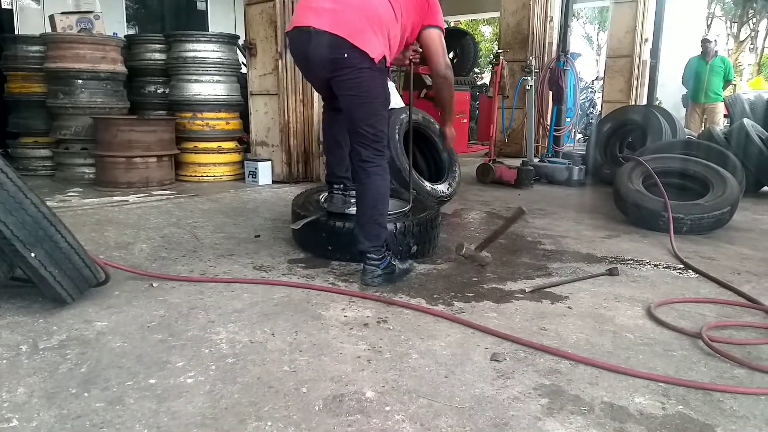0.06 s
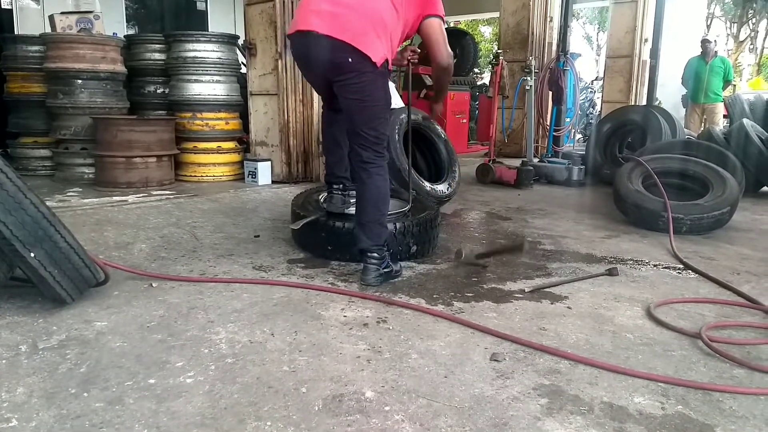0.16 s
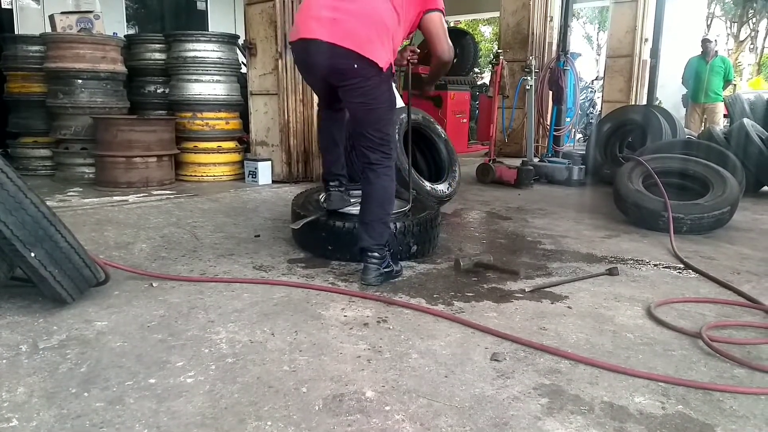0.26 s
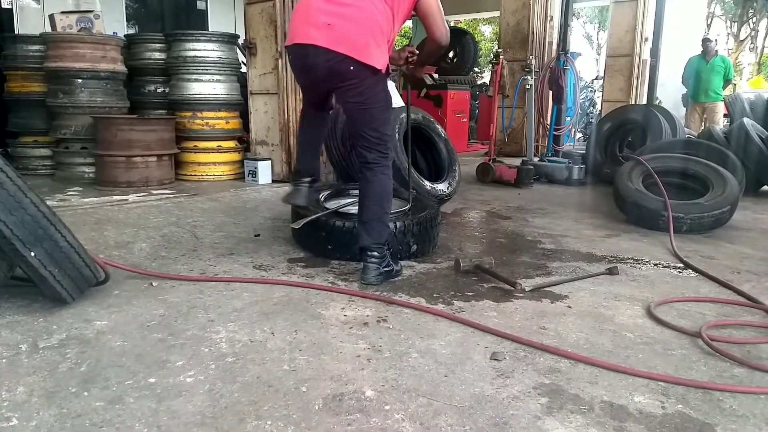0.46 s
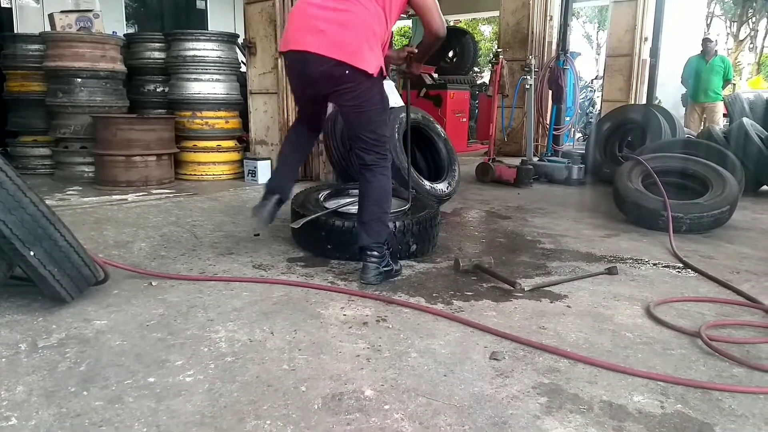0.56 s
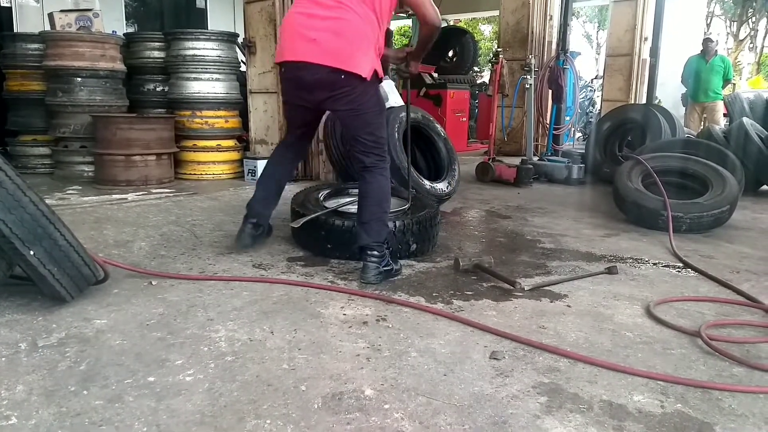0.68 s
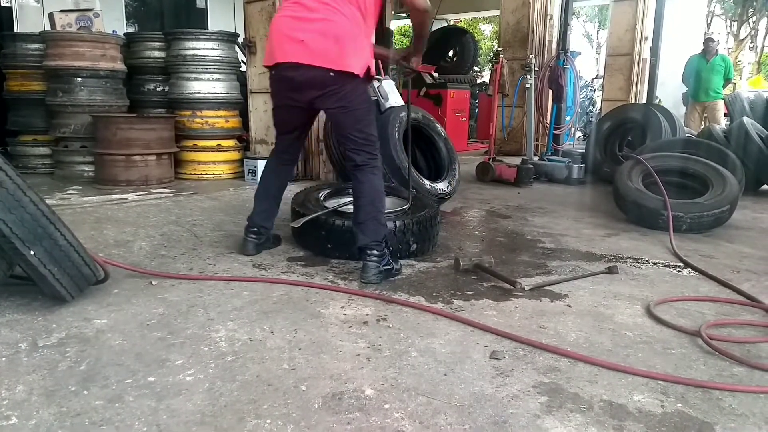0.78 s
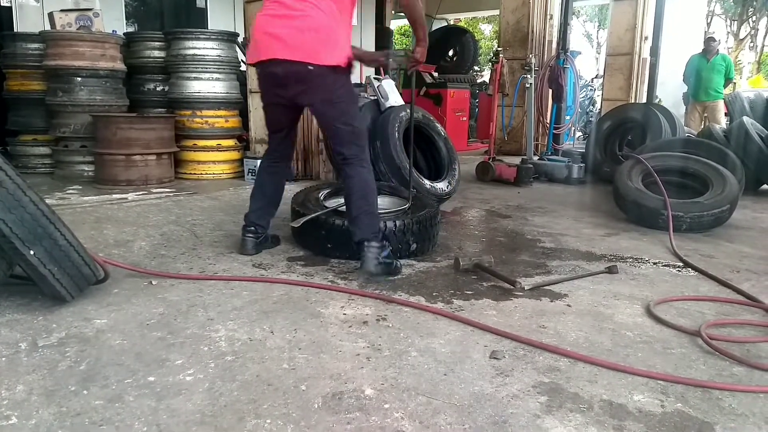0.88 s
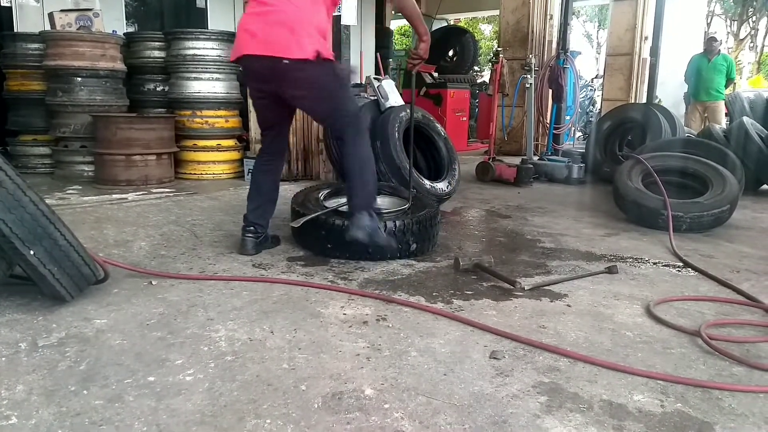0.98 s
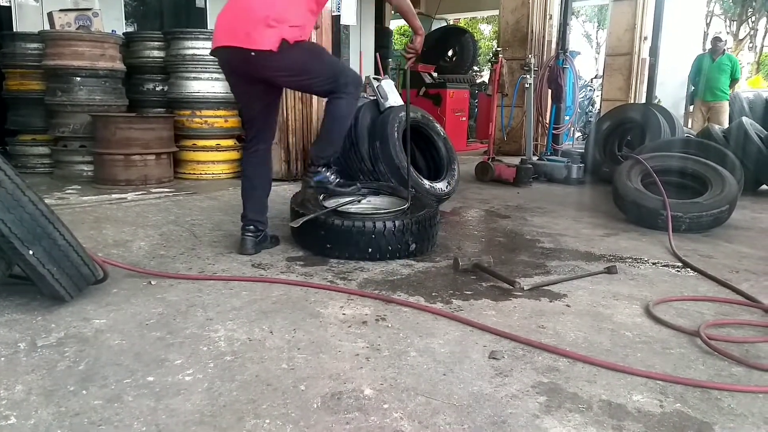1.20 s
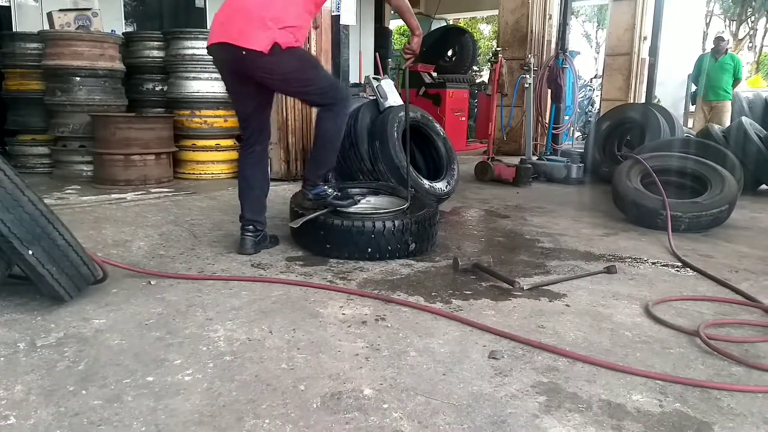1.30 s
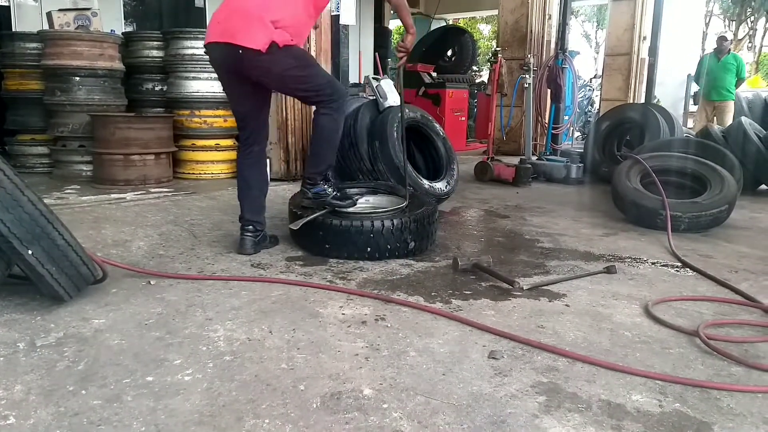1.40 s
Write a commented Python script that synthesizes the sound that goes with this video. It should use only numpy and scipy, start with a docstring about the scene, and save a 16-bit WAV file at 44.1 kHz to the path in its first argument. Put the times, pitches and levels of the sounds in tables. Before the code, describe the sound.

A steel tool falls on a concrete floor, bounces, clatters and rings briefly. Shoes scuff faintly, then a tyre bumps softly as a lever knocks once on its rim. The open workshop has a short echo and low background noise.

```python
"""An open workshop: low steady noise, and the shed's echo of earlier work dying away.
Shoes scuff and thud, grit cracks. At 0.22 s a steel tyre tool lands on the concrete floor,
slaps down, rattles and rings. Near 1.3 s the tyre bumps hollowly under boot and lever,
and the lever knocks once against the wheel rim. The microphone is dull and nearly mono."""
import sys
import numpy as np
from scipy import signal
from scipy.fft import rfft, irfft
from scipy.io import wavfile
from scipy.ndimage import uniform_filter1d, minimum_filter1d

SR = 44100
rng = np.random.default_rng(int(sys.argv[2]) if len(sys.argv) > 2 else 0)


def log_audio(samples):
    """Write samples as a 16-bit WAV file to the path given in sys.argv[1]."""
    # one column per channel
    frames = np.atleast_2d(samples).T
    # limit to full scale, then quantise
    limited = np.clip(frames, -1, 1)
    pcm = np.round(limited * 32767).astype(np.int16)
    wavfile.write(sys.argv[1], SR, pcm)


N = 63945
T = np.arange(N) / SR


def amp(db):
    """Decibels to gain."""
    return 10 ** (np.asarray(db) / 20)


def curve_at(points, hz):
    """Curve value at hz, log-frequency axis."""
    f, value = np.transpose(points)
    return np.interp(np.log(hz + 1), np.log(f + 1), value)


def add(mix, start_s, sound):
    """Mixes sound in at start_s."""
    part = mix[max(round(start_s * SR), 0):][:len(sound)]
    part += sound[:len(part)]


def colour(x, spectrum):
    """Minimum-phase filter; white noise keeps its power."""
    gain = amp(curve_at(spectrum, abs(np.fft.fftfreq(4096, 1 / SR))))
    response = np.exp(np.conj(signal.hilbert(np.log(gain))))
    taps = np.fft.ifft(response).real[:2048]
    return signal.fftconvolve(x, taps / np.linalg.norm(taps))[:N]


def envelope(rise_s, t60_s):
    """Linear rise, exponential decay."""
    return np.minimum(T / rise_s, 1) * np.exp(-np.log(1000) * np.maximum(T - rise_s, 0) / t60_s)


def burst(db, rise_s, t60_s):
    """Decaying white noise."""
    return amp(db) * envelope(rise_s, t60_s) * rng.standard_normal(N)


def blows(events, spectrum, rise_s):
    """Noise bursts coloured by the struck body."""
    out = np.zeros(N)
    for start_s, db, t60_s in events:
        add(out, start_s, burst(db, rise_s, t60_s))
    return colour(out, spectrum)


def ring(modes, rise_s, waver_hz=0, waver_step_s=0.00688):
    """Struck metal: decaying sines, optional random pitch waver."""
    out = np.zeros(SR)
    for hz, db, t60_s in modes:
        waver = np.interp(T[:SR] / waver_step_s, np.arange(400), rng.standard_normal(400))
        phase = 2 * np.pi * np.cumsum(hz + waver_hz * waver) / SR
        out += amp(db) * envelope(rise_s, t60_s)[:SR] * np.sin(phase)
    return out


# workshop noise: f/Hz, density/dB
WORKSHOP_SPECTRUM = [(25, -22), (50, -12.5), (130, 0), (200, -4.5), (290, -15.5), (420, -12), (660, -20.5),
                     (1600, -17), (2400, -17.5), (3700, -8.5), (4800, -18), (5800, -21.5), (7600, -45),
                     (9500, -67.5), (12000, -45), (16000, -40)]
# shed echo: f/Hz, density/dB
ECHO_SPECTRUM = [(30, -28), (120, -19), (430, -2.5), (650, -8), (950, -0.5), (1250, -7), (1600, -2.5),
                 (2700, -9), (3900, -11.5), (5900, -34), (8000, -64)]
def background():
    """Steady workshop noise plus the fading echo of earlier work."""
    steady = colour(amp(-55.5) * rng.standard_normal(N), WORKSHOP_SPECTRUM)
    echo = colour(burst(db=-40.5, rise_s=1 / SR, t60_s=0.96), ECHO_SPECTRUM)
    return steady + echo


# sole slides: t/s, level/dB, rise/s, t60/s
SCUFFS = [(.06, -46.5, 0.012, 0.56), (.105, -49, .012, 0.17), (.745, -55.5, 0.013, 0.86),
          (.857, -55.5, .003, 0.39), (0.9023, -44, 0.0042, 0.026), (1.17, -59.5, 0.021, 0.37),
          (1.265, -46, 0.024, 0.02)]
# gritty friction: f/Hz, density/dB
SCUFF_SPECTRUM = [(200, -5), (1500, -7), (2300, -1.5), (3800, 7.5), (4800, -5.5), (6500, -13), (9000, -45),
                  (14000, -25), (16000, -37)]
def shoe_scuffs():
    """Soles slide briefly over gritty concrete."""
    out = np.zeros(N)
    for start_s, db, rise_s, t60_s in SCUFFS:
        add(out, start_s, burst(db, rise_s, t60_s))
    return colour(out, SCUFF_SPECTRUM)


# grain cracks: t/s, level/dB, t60/s
TICKS = [(.2, -64, 0.033), (.3675, -46.5, 0.027), (.755, -64, 0.06), (1.281, -66, .12)]
# cracking grit: f/Hz, density/dB
TICK_SPECTRUM = [(1000, 5), (6000, -2), (9000, -17), (11000, -8), (14000, 0), (16000, -4)]
def grit_ticks():
    """Grains crack under steel and soles."""
    return blows(TICKS, TICK_SPECTRUM, rise_s=0.0024)


# floor impacts: t/s, level/dB, t60/s
THUDS = [(.201, -39, 0.12), (.228, -37, .1), (.264, -35.5, .06), (.3455, -33.5, .04), (.3675, -32.5, 0.028),
         (.389, -39, 0.15), (.473, -50.5, .06), (.747, -51, 0.064)]
# dull impact: f/Hz, density/dB
THUD_SPECTRUM = [(30, -31.5), (120, -8.5), (280, -3.5), (520, -4), (950, 0), (1400, -12), (3000, -20.5),
                 (7000, -50)]
def floor_thuds():
    """Shoes and the tool's shaft thud on the floor."""
    return blows(THUDS, THUD_SPECTRUM, rise_s=0.0016)


# tool-floor contacts: t/s, level/dB, clatter offset/dB
TOOL_CONTACTS = [(.2242, -33, 5.5), (.2280, -9, 1.5), (.2312, -4, -7.5), (.2455, -28, 6), (.2615, -13, 3),
                 (.2700, -7.5, -4.5), (.2770, -7, 1), (0.31, -22.5, -4), (.3310, -30, -9),
                 (.3425, -23.5, 8), (.3728, -32.5, 9.5), (.4390, -25.5, -3.5)]
# steel modes: f/Hz, level/dB, t60/s
TOOL_MODES = [(916, -38.5, 0.26), (1548, -34.5, 0.17), (2156, -23.5, 0.46), (2213, -14.5, 0.27),
              (2247, -21, 0.39), (2612, -22, 0.084), (3090, -34, 0.075), (3277, -8.5, 0.063),
              (3750, -7.5, 0.1), (3769, -1.5, 0.042), (4255, -26, 0.086), (5365, -21, 0.36),
              (5440, -20, 0.2)]
# dense contact ring: f/Hz, density/dB
CLATTER_SPECTRUM = [(100, -42), (700, -33.5), (1000, -16), (1300, -26.5), (1600, -8.5), (1950, -12),
                    (2650, -2.5), (3250, 0.5), (3550, -3), (4150, 4.5), (4600, -7), (5150, -15.5),
                    (5800, -12.5), (6300, -32.5), (7100, -31.5), (9000, -68.5), (12000, -56), (16000, -53)]
def dropped_tool(rise_s=0.0009, clatter_trim_db=-0.5):
    """Each contact excites the steel's modes and a short clatter; returns (tone, clatter)."""
    steel = ring(TOOL_MODES, rise_s, waver_hz=22.5)  # wavers as the tool rocks
    tone, clatter = np.zeros(N), np.zeros(N)
    for start_s, db, offset_db in TOOL_CONTACTS:
        add(tone, start_s, amp(db) * steel)
        add(clatter, start_s, burst(db + offset_db + clatter_trim_db, rise_s, t60_s=0.054))
    return tone, colour(clatter, CLATTER_SPECTRUM)


# blows on the tyre: t/s, level/dB, t60/s
BUMPS = [(1.276, -48.5, 0.15), (1.315, -46, 0.21), (1.37, -56.5, 0.52)]
# hollow tyre: f/Hz, density/dB
TYRE_SPECTRUM = [(40, -24), (130, -11.5), (200, 5.5), (300, -8), (400, -1), (470, 3), (545, -1.5),
                 (800, -29.5), (1000, -9), (2000, -9.5), (8000, -71)]
def tyre_bumps():
    """The tyre resonates under boot and lever."""
    return blows(BUMPS, TYRE_SPECTRUM, rise_s=0.002)


# lever-rim contacts: t/s, level/dB, t60/s
LEVER_CONTACTS = [(1.3137, -23, 0.028), (1.3194, -32, .05)]
# contact crack: f/Hz, density/dB
CRACK_SPECTRUM = [(100, -32.5), (500, -9.5), (1400, -26.5), (1900, -3), (2400, -2), (3150, 1.5),
                  (4200, -7.5), (5200, -18), (6300, -30), (8500, -65), (15000, -47)]
# wheel rim modes: f/Hz, level/dB, t60/s
RIM_MODES = [(439.3, -30, .5), (1765, -24, 0.57), (1970, -23, 0.37), (2205, -16, .4), (2610, -24, .4),
             (3070, -27, .4), (4630, -27, 0.45)]
def lever_knock(rise_s=0.00028, rim_trim_db=-3.5):
    """Lever hits rim: a sharp crack and a faint ring, damped by the tyre."""
    rim, tone = ring(RIM_MODES, rise_s), np.zeros(N)
    for start_s, db, _ in LEVER_CONTACTS:
        add(tone, start_s, amp(db + rim_trim_db) * rim)
    return tone + blows(LEVER_CONTACTS, CRACK_SPECTRUM, rise_s)


# shed decay: f/Hz, t60/s
SHED_DECAY = [(150, 0.75), (600, 0.63), (2000, 0.72), (4000, 0.57), (8000, 0.63)]
def shed_reverb(x, delay_s=0.0042, build_s=0.013):
    """Diffuse reflections build up, then decay per band; a new set each call."""
    hz, t, bands = signal.stft(rng.choice([-1., 1.], N), SR, nperseg=256)
    decay = np.exp(-np.log(1000) * t / curve_at(SHED_DECAY, hz)[:, None])
    tail = signal.istft(bands * decay, SR)[1][:N]
    tail *= np.clip((T - delay_s) / build_s, 0, 1)
    return signal.fftconvolve(x, tail / np.linalg.norm(tail))[:N]


# ambience width: f/Hz, side level/dB
WIDTH = [(700, -55.5), (1100, -36.5), (1700, -15), (2500, -18.5), (4000, -32.5), (12000, -28)]
# leftward lean of the midrange: f/Hz, side re mid/dB
LEFT_LEAN = [(800, -54.5), (1200, -37), (1600, -20), (2200, -18.5), (4000, -33)]
def scene(swing_hz=17):
    """Sources ahead, slightly left; reflections and background add a little width."""
    tone, clatter = dropped_tool()
    # signal, reverb send/dB
    sources = [(tone, -6), (clatter, -5), (floor_thuds(), -4), (tyre_bumps(), -2.5),
               (grit_ticks(), -6.5), (lever_knock(), -3), (shoe_scuffs(), -6)]
    direct = sum(x for x, _ in sources)
    send = sum(amp(send_db) * x for x, send_db in sources)
    swing = 2 * np.pi * swing_hz * T  # moving sources swing between two sets of reflections
    reflections = shed_reverb(send * np.cos(swing)) + shed_reverb(send * np.sin(swing))
    mid = direct + reflections + background()
    ambience = shed_reverb(send) + background()
    hz = np.fft.rfftfreq(2 * N, 1 / SR)
    width = rfft(ambience, 2 * N) * amp(curve_at(WIDTH, hz))
    lean = rfft(mid, 2 * N) * amp(curve_at(LEFT_LEAN, hz))
    side = irfft(width + lean)[:N]
    return np.array([mid + side, mid - side])


def record(dry, low_cut_hz=58, ceiling=0.96, band_limit_hz=15800):
    """Microphone bass cut, fast peak limiter, band limit."""
    thin = signal.sosfilt(signal.butter(2, low_cut_hz, "high", fs=SR, output="sos"), dry)
    gain = np.minimum(1, ceiling / (abs(thin).max(0) + 1e-9))
    gain = uniform_filter1d(minimum_filter1d(gain, size=121), size=121)
    lowpass = signal.firwin(511, band_limit_hz, window=("kaiser", 9), fs=SR)
    return signal.oaconvolve(thin * gain, lowpass[None], "same")


dry = scene()
out = record(dry)
log_audio(out)
```